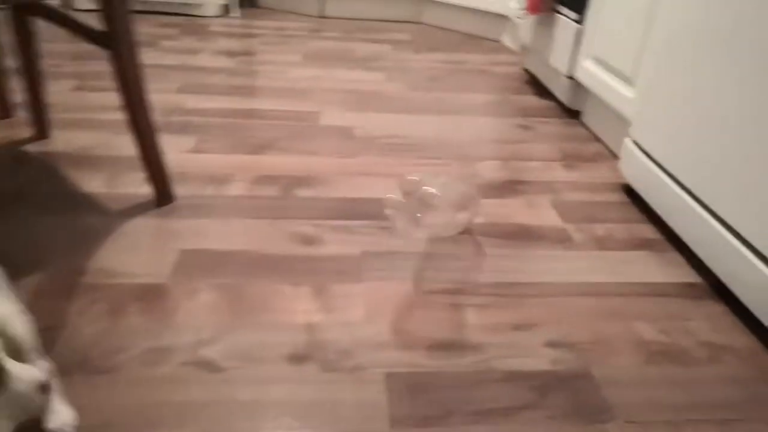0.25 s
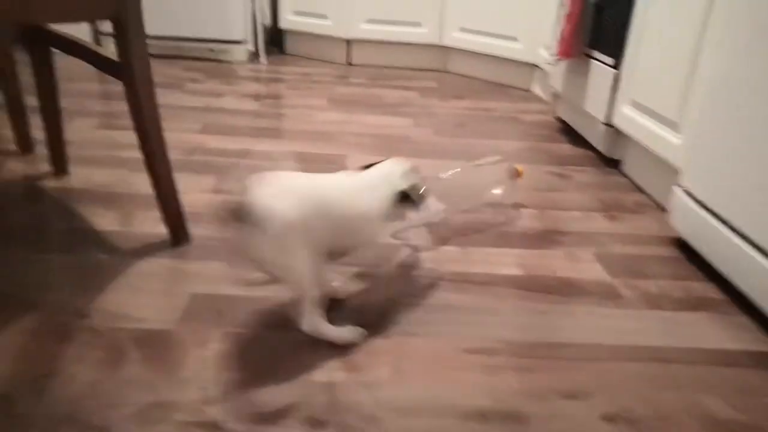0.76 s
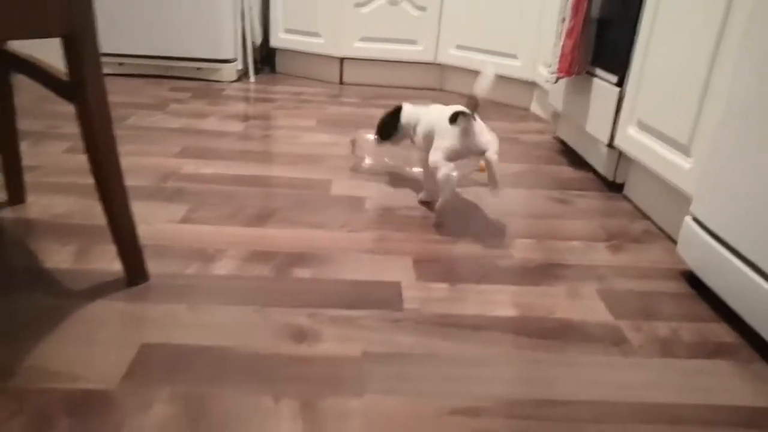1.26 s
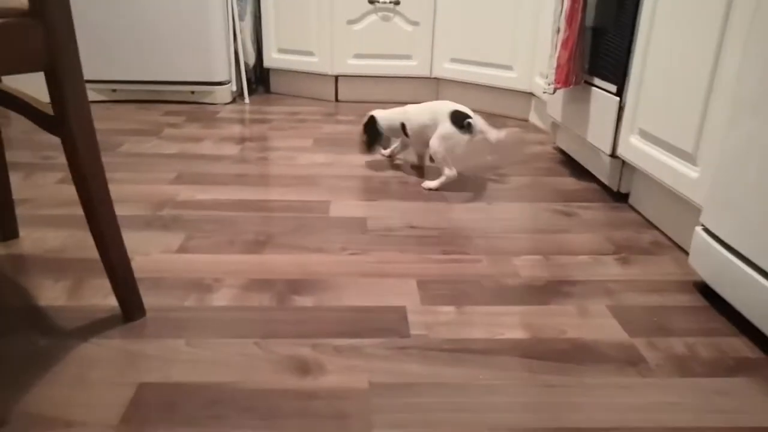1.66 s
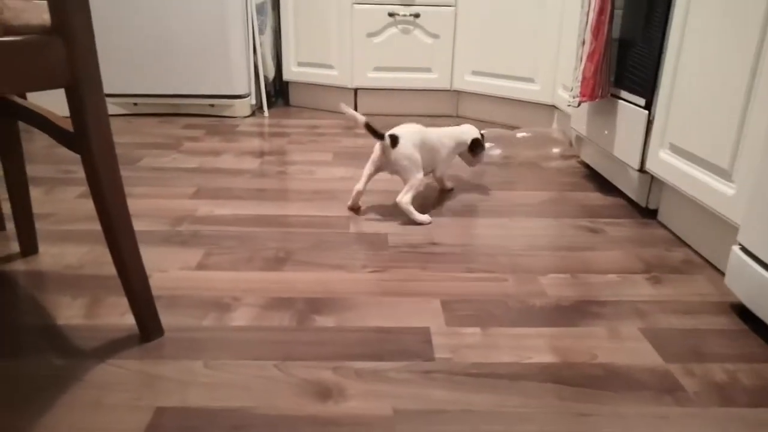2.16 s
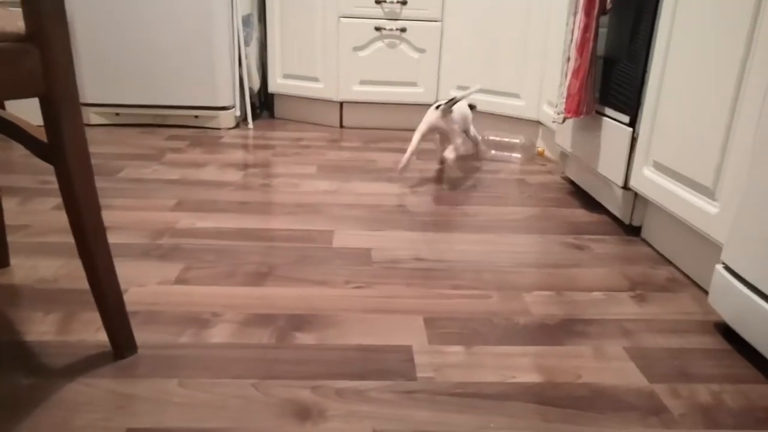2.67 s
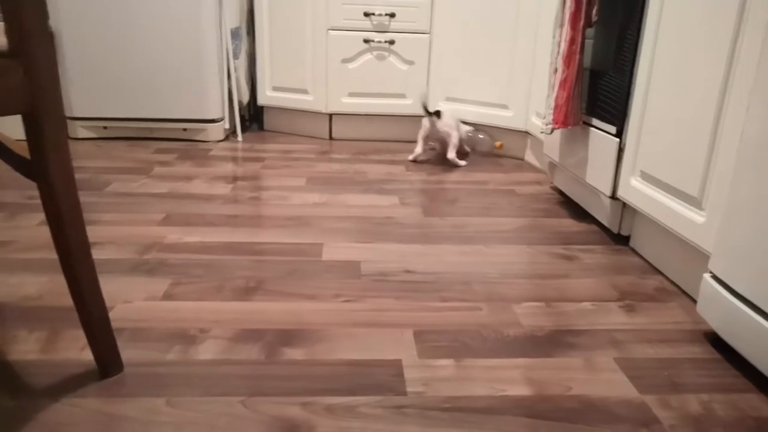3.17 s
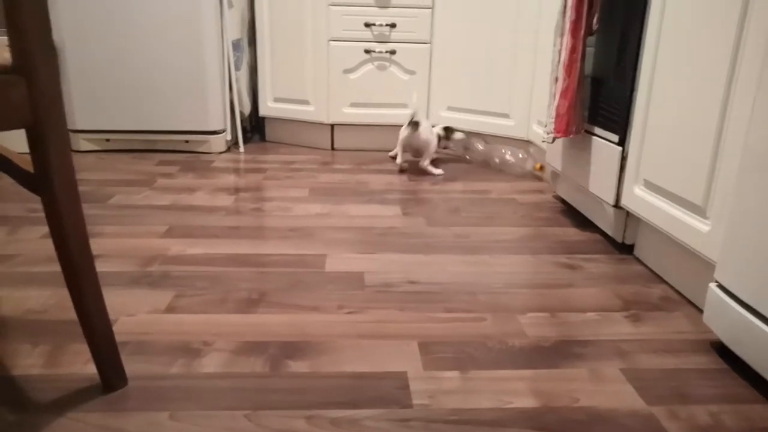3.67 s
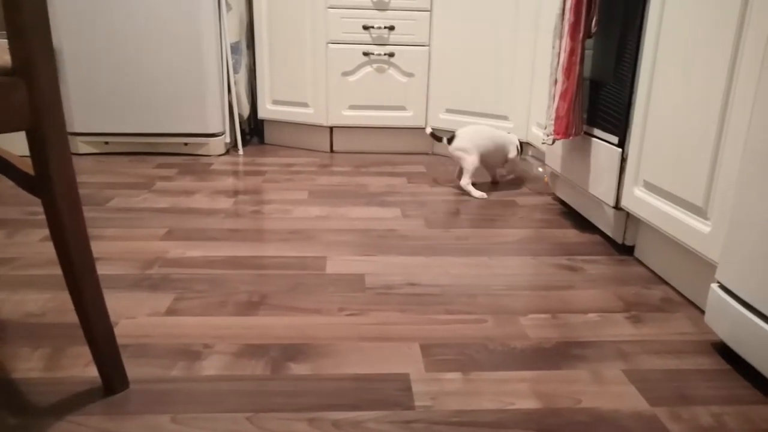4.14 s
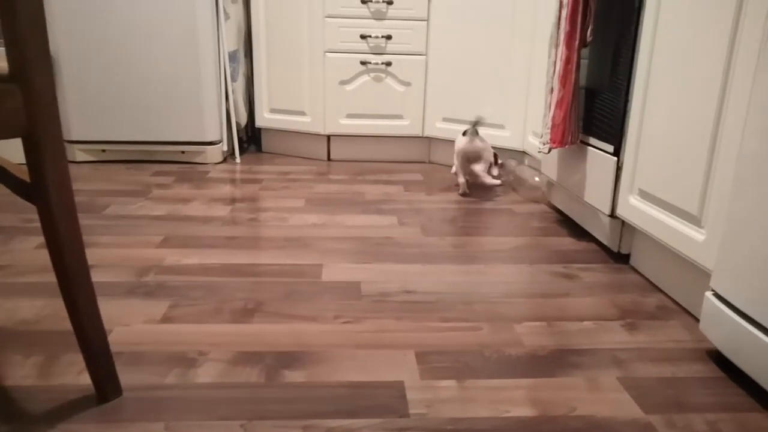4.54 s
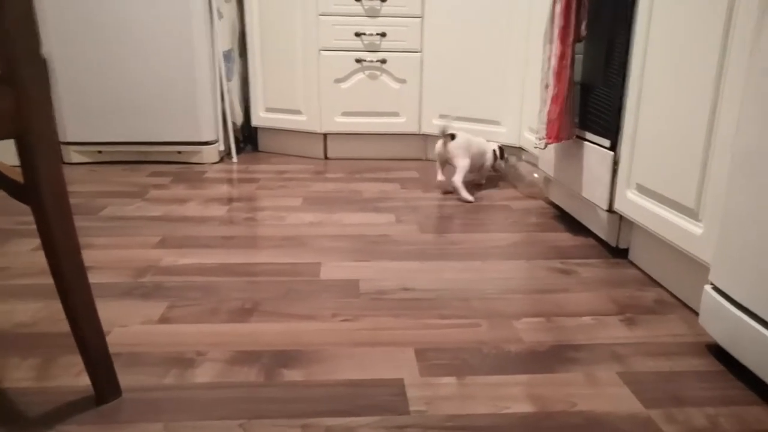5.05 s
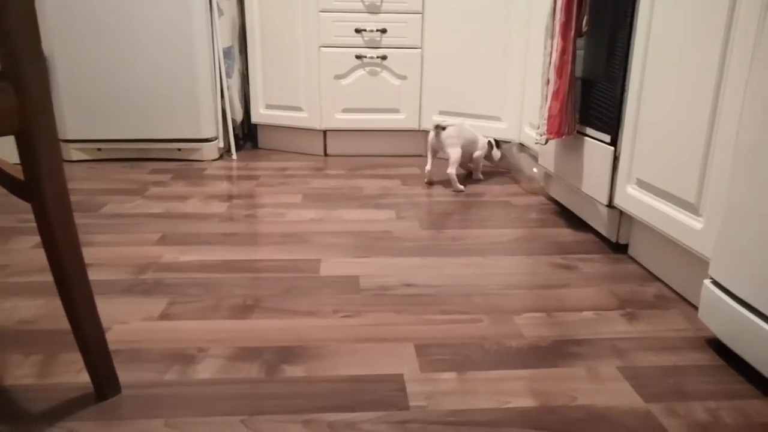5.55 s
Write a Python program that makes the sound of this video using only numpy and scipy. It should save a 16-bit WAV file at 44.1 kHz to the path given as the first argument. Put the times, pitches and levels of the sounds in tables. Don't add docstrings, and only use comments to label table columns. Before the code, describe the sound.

In a lively, hard-surfaced kitchen, a puppy plays with an empty thin plastic bottle. Two sharp snaps come at once near 0.1 s, then a hollow knock at 0.3 and a scrape at 0.4. A crush at 0.75 leads to clattering knocks from 0.9 to 1.2 s, followed by the densest flurry of bites, pops and bright crackle at 1.4-1.75. From about 1.8 to 2.7 there are only faint crinkles, light scraping and small bumps. Loud hollow cracks return at 2.75-3.0, with a sliding scrape, then lighter nudges to 3.5. Knocks and crushes cluster at 3.7-4.1, a heavy knock hits at 4.4 and a crush at 4.7. It is nearly quiet afterwards, with soft nudges from 5.0 and a last snap with a crunch around 5.55. Paws thump softly; short echoes and faint hiss surround everything as the bottle moves away from the stereo microphone.

```python
import sys
import numpy as np
from scipy import signal
from scipy.fft import rfft, irfft
from scipy.io import wavfile
from scipy.ndimage import uniform_filter1d

SR = 44100
rng = np.random.default_rng(int(sys.argv[2]) if len(sys.argv) > 2 else 0)


def voltage_ratio(level):
    return 10 ** (np.asarray(level, float) / 20)


def master(y):
    cut = np.clip(np.atleast_2d(y).T, -1, 1)
    pcm = np.round(cut * 32767)
    wavfile.write(sys.argv[1], SR, pcm.astype(np.int16))


N = 256212

# (pitch [Hz], level [dB], time to fade by 60 dB [s])
HOLLOW_MODES = [(151.2, -15, 0.14), (245, -8.5, 0.15), (292, -9, 0.1007), (364, -3.5, 0.026),
                (523, -1.5, 0.021), (659.4, -1.5, 0.0045)]
SHELL_MODES = [(635, -0.5, 0.016), (801, 0.5, 0.015), (923, 1.5, 0.0254), (1176, 5, 0.018),
               (1269, 4.5, 0.0205), (1733, 5, 0.005)]
WALL_MODES = [(1470, -15, 0.0077), (1690, -8.5, 0.01654), (1759, -5.5, 0.014), (1984, -5.5, 0.01207),
              (2130, -4, 0.016), (2310, 2, 0.0041), (2650, -5, 0.014), (2830, -3, 0.0024)]
CREASE_MODES = [(3053, 2.5, 0.00089), (5100, -2, 0.0024), (5733, -6, 0.0038), (6740, -4, 0.001158),
                (8350, -18, 0.0004), (9466, -21, 0.00172), (10600, -40, 0.001), (13730, -21, .0004)]

# (time [s], peak [dB], shell relative to peak [dB], creases relative to peak [dB])
KNOCKS = [(.337, -6, 0.5, -23.5), (.928, -7.5, -14, -22), (1.023, -34.5, -17, -24),
          (1.122, -1.5, -11.5, -19), (1.211, -2, -17.5, -27.5), (1.4262, -7.5, -3.5, -19),
          (2.366, -22.5, -14, -30.5), (2.983, -1, -4.5, -42), (3.377, -17.5, -5.5, -23.5),
          (3.725, -4.5, 0, -66), (3.885, -7, -13, -58), (4.428, 2.5, -4, -29), (4.696, -12.5, -32.5, -23)]
BITES = [
    (0.071, -5.5, -16, -17.5),
    (0.0925, -4, -14.5, -13.5),
    (1.4873, 1, -36.5, -16),
    (1.503, -21.5, -22, 1.5),
    (1.52, -7, -8.5, -17),
    (1.564, -2.5, -14, -8),
    (1.575, -22.5, -45, -14),
    (2.814, -1, -9, -29),
    (5.5646, -3, -23, -23.5),
]
NUDGES = [(0.252, -55.5, -17, 16), (.419, -23, 7.5, -2), (0.904, -17, -6, -16), (1.069, -24, 0, -22),
          (1.234, -24, 7, -15), (1.393, -23, 5, -26), (2.533, -30.5, 0, -33), (2.908, -17.5, 2.5, -14.5),
          (3.175, -19.5, -2.5, -29.5), (3.358, -24.5, -11, -32), (3.474, -23.5, -3, -21),
          (3.771, -27.5, -3, -10), (4.0245, -9, -8, -29.5), (4.075, -15, 4.5, -22), (5.034, -27.5, 5, -14),
          (5.372, -33, -2, -21.5), (5.476, -31.5, -14, -31), (5.525, -14.5, -3.5, -32.5),
          (5.535, -16, 3, -19)]
CRUMPLES = [(2.135, -33.5, -10, -8.5), (2.172, -32.5, -2.5, -36), (2.257, -29, -11.5, -7.5),
            (2.396, -36.5, 3.5, -5), (2.501, -26.5, -13, -47), (3.31, -27, -19, -28.5),
            (2.56, -48, 1.5, -24), (3.647, -38, -14, -18), (3.865, -24.5, -3, -22),
            (0.681, -44, -22.5, -9.5), (3.664, -24.5, 0.5, -15), (3.945, -22, -4, -17.5),
            (4.375, -31, 2, -19), (4.398, -24.5, -7.5, -26.5), (4.636, -33, -1, -16),
            (5.056, -22, 2, -17.5), (5.495, -38.5, 8.5, -29)]
CRUSHES = [
    (0.75, -6, -8, -14),
    (1.601, -21, -15.5, -3.5),
    (1.729, -16.5, -4, -14.5),
    (2.754, -9, -4, -26),
    (4.092, -10, -2, -28.5),
    (4.669, -11.5, 0.5, -24),
    (5.575, -26, -6, -26),
]
# (hollow air relative to peak [dB], crackle length [ms])
BLOW_KINDS = [
    (-22.5, 9.4),
    (-32.5, 6.37),
    (-9.5, 13.8),
    (-11, 35),
    (-23.5, 26.88),
]

# (from time [s], favoured wall pitch [Hz], favour [dB], crease brightness [dB per octave])
POSES = [(0, 2130, 6, -4.5), (.085, 2100, 6, -3), (.24, 2050, 4, -8), (.4, 2100, -1, 0.5),
         (.74, 2100, 1, 0), (.89, 2070, -2.5, -6), (1.11, 2620, 2, -4.5), (1.2, 2130, 1.1, -2.5),
         (1.38, 2060, 3.97, -5), (1.48, 2318, 11.5, -1.5), (1.55, 2060, 5, -4), (1.72, 1950, -1.03, -1),
         (2.12, 2200, 4, 4), (2.35, 2200, 0.5, -1), (2.74, 1880, 1.5, 0), (2.805, 1900, 4, -2),
         (2.97, 1530, 3, -1.3), (3.3, 1870, 1.5, 1.5), (3.65, 2650, 3.5, -4.08), (3.72, 2000, 2.32, -4),
         (3.87, 2080, 3.37, -1.23), (4.01, 1680, 0.5, -7), (4.36, 2100, -2.9, 6), (4.42, 1900, 2, -8.5),
         (4.63, 1720, 0.5, 1), (5.02, 1900, -4.8, -0.6), (5.35, 1900, 4, 0.1), (5.51, 1700, -2, -1),
         (5.555, 1700, 9, -13)]
# (time [s], peak [dB], pitch [Hz], time to fade by 60 dB [s])
BOOMS = [(0.069, -17, 358, 0.085), (0.165, -31.5, 242, 0.248), (0.335, -27, 374, 0.25),
         (0.416, -20, 203, 0.15), (0.763, -23.5, 270, 0.0605), (0.908, -22.5, 289, 0.086),
         (1.07, -24.5, 274, 0.176), (1.115, -17, 121, 0.095), (1.423, -10.5, 331, 0.0423),
         (1.801, -34.5, 277, 0.87), (1.897, -33.5, 261, 0.097), (2.187, -33, 383, 0.2),
         (2.408, -19, 236, 0.097), (2.451, -24, 247.4, 0.3), (2.815, -10, 300, 0.092),
         (2.935, -14, 335, 0.12), (2.989, -13, 236, 0.15), (2.83, -21, 245, 0.4), (3.165, -22, 298, 0.2),
         (3.372, -15.5, 245, 0.0727), (3.478, -27, 258, 0.45), (3.734, -19, 290, 0.18),
         (3.886, -20, 255, 0.2), (3.93, -24, 370, 0.3), (3.6, -36, 300, 0.4), (2.5, -30, 245, 0.4),
         (4.021, -15, 245.4, 0.164), (4.375, -28.5, 129, 0.25), (4.425, -13, 195, 0.077),
         (4.685, -20, 213.2, 0.1045), (5.052, -27, 130.4, 0.32), (5.167, -18, 176, 0.034),
         (5.37, -35.5, 155.6, 0.125), (0.907, -25.5, 156.5, 0.248), (1.223, -31, 144.2, 0.188),
         (1.95, -39, 100.4, 0.147), (2.915, -25, 152.7, 0.486), (3.13, -29, 159.4, 0.375),
         (3.361, -29.5, 146.7, 0.28), (3.479, -27, 165, 0.15), (4.021, -29, 160, 0.347),
         (4.53, -32, 149, 0.3), (5.495, -26.5, 182, 0.136), (5.526, -23, 157.9, 0.2),
         (5.56, -34, 72.2, 0.9), (5.53, -23, 292, 0.1)]
# (time [s], peak [dB], pitch [Hz], time to fade by 60 dB [s])
BASE_RINGS = [(0.0952, -25.5, 1110, 0.094), (0.7552, -23, 1100, 0.2), (0.9274, -19, 1195, 0.22),
              (1.018, -28, 1173, 0.25), (0.98, -29, 1160, 0.3), (1.518, -28, 554, 0.16),
              (2.7545, -26, 1295, 0.2), (2.94, -27, 1150, 0.2), (2.8438, -20, 1131, 0.24),
              (3.018, -29, 1200, 0.33), (3.08, -33, 1113, 0.37), (3.3567, -27.5, 1176, 0.039),
              (3.4725, -32, 1260, 0.061), (3.7256, -19.5, 1179, 0.18), (3.76, -19, 1128, 0.13),
              (3.8831, -24, 1184, 0.28), (4.0244, -30, 1066, 0.4), (4.4275, -19, 1186, 0.23),
              (4.4725, -26, 1268, 0.13), (4.6723, -26, 964.6, 0.12), (4.6981, -26, 1253, 0.16),
              (5.036, -38.5, 1262, 0.62), (5.5637, -27, 910, 0.15), (0.0735, -22, 2110, 0.045),
              (0.112, -34.5, 2065, 0.136), (4.805, -40, 1850, 0.3), (4.11, -36, 1690, 0.43),
              (4.1, -29.5, 2650, 0.117), (4.76, -37.5, 1690, 0.22), (4.45, -25.5, 1053, 0.1),
              (3.684, -36, 2700, 0.1)]
# (time [s], peak [dB], pitch [Hz], length [ms])
DENT_POPS = [(0.0735, -3.5, 2180, 2.2), (0.0934, 2, 2090, 2.6), (0.337, -2.5, 1890, 2.94),
             (0.416, -8.5, 2200, 2), (0.9275, -5, 1176, 4.5), (0.941, -12, 1150, 8), (0.955, -15, 1150, 12),
             (1.4557, -14, 2600, 2), (1.5025, -12, 4600, 1.2), (1.531, -9, 2500, 3),
             (1.536, -10, 2900, 2.5), (1.551, -11, 1500, 3), (1.5658, -5, 6600, 1.2), (1.570, -12, 5300, 3),
             (1.577, -8, 2500, 3), (1.604, -10, 2100, 4), (4.6732, -14, 1000, 2.5), (4.6865, -14, 1200, 3),
             (4.637, -26, 900, 2), (2.8245, -8, 1100, 2), (1.234, -12, 2100, 2), (0.0728, -8, 2900, 1.2),
             (0.0955, -8, 2700, 1.5), (0.097, -14, 1400, 2), (0.419, -10, 1200, 1.5),
             (3.7255, -5, 1300, 1.6), (1.124, -5.5, 2560, 4.5), (1.4308, 0.5, 2040, 1.66),
             (1.488, -1, 2100, 2.5), (1.499, -9, 2550, 9.6), (1.566, -5.5, 2368, 3.66),
             (1.573, -2, 2200, 3.5), (1.733, -13, 1850, 3.5), (1.2115, -8, 2287, 2.1),
             (3.474, -20, 1300, 2), (4.0245, -14, 1100, 3.1), (2.8145, -5.5, 2500, 4),
             (0.3385, -4, 1236, 3.6), (0.0725, -14, 747, 4), (0.0945, -12, 1147, 3.9),
             (4.4295, -10.5, 540, 6.6), (0.7535, -4.5, 2040, 1.23), (1.5195, -6, 2200, 2),
             (4.435, -15.5, 1700, 1.18), (4.0956, -10, 2360, 2.2), (2.816, 2, 1010, 1.7),
             (2.983, 5, 1355, 2.5), (3.728, -8, 1392, 3.6), (3.885, -28, 1190, 1.7),
             (4.428, -2.5, 1568, 3.1), (5.528, -12, 288.2, 6.5), (5.549, -17, 408, 4.2),
             (5.5645, -7, 1070, 3.8)]
# (time [s], peak [dB])
CAP_TICKS = [
    (0.2725, -55),
    (0.642, -51),
    (1.042, -51),
    (2.261, -46),
    (2.8194, -51.5),
    (3.666, -45.5),
    (3.6933, -47),
    (3.7863, -57),
    (4.0228, -32.5),
    (4.045, -60),
]
# (time [s], scraping [dB], hold [s])
SHOVES = [(.26, -25.5, 0.014), (.42, -19, 0.094), (.6, -27.5, 0.0273), (1.03, -24.5, 0.028),
          (1.24, -15, 0.0277), (1.445, -13, 0.021), (1.65, -26, 0.11), (1.86, -38, 0.185),
          (2.2, -39.5, 0.142), (2.43, -28, 0.011), (2.52, -32, 0.06), (2.785, -22.5, 0.02),
          (1.5, -19.5, 0.037), (2.95, -17, 0.178), (3.45, -33, 0.131), (3.9, -20.5, 0.041),
          (4.3, -33.5, 0.152), (4.58, -34, .08), (4.9, -48, .1), (2.66, -47, .07), (.68, -42, .06),
          (3.6, -42, .05), (5.2, -43.5, 0.17), (5.4, -43, .08), (5.64, -24, 0.0497)]
# (time [s], level [dB], hold [s])
FOOTFALLS = [(.07, -39.5, 0.01), (.335, -87, .01), (.41, -41.5, 0.0095), (.77, -64, .02),
             (.9, -41.5, 0.038), (1.12, -35, 0.058), (1.22, -40, 0.023), (1.43, -37.5, 0.017),
             (1.96, -67, 0.033), (2.19, -48.5, 0.1056), (2.42, -52, 0.0146), (2.52, -69.5, 0.018),
             (2.81, -65, .02), (2.93, -36.5, 0.039), (3.05, -38, 0.16), (3.49, -45.5, 0.0087),
             (3.77, -61.5, 0.025), (3.9, -43.5, 0.258), (4.39, -48, 0.065), (4.53, -52, 0.057),
             (4.69, -44, 0.022), (5.06, -47.5, 0.059), (5.2, -50, 0.075), (5.38, -52, 0.027),
             (5.54, -43, 0.18)]

# (pitch [Hz], time to fade by 60 dB [s])
ECHO_TIMES = [(80, 0.26), (250, 0.31), (600, 0.47), (1500, 0.5), (4000, 0.55), (10000, 0.43), (14000, 0.42)]
# (pitch [Hz], left-right likeness [0 to 1])
LIKENESS = [(60, 1), (130, 1), (290, 0.75), (640, 0.46), (1410, 0.068), (3100, 0.1), (6820, 0.4),
            (15000, .05)]
# (pitch [Hz], level [dB per Hz])
HUSH_COLOUR = [(24, -12), (45, -6), (125, -19.5), (401, -15), (597, -26), (1920, -22), (4000, -23),
               (13000, -48.5)]
# (pitch [Hz], left minus right [dB])
PORT_COLOUR = [(150, -0.55), (700, 0.5), (2050, -5.5), (3600, -4), (6500, 1.7), (9800, 26.5), (12000, 10.5),
               (15000, 2)]

SHOVE_RISE_DB_S, SHOVE_FALL_DB_S, REST_DB = 387.5, 200, -53
STEP_RISE_DB_S, STEP_FALL_DB_S, STILL_DB = 898, 221, -71
ROLL_DB, CRINKLE_DB = 5, -20
FAVOUR_OCTAVES, CREASE_PIVOT_HZ = 0.15, 6040
KITCHEN_DB, HUSH_DB = 5.5, -61.5
KNEE_S, KNEE_DB = 0.18, -11
CLOSE_DB, LEAVING_S = 3.5, 0.94
GATE_DB, GATE_SLOPE, GATE_DEPTH_DB, GATE_RELEASE_DB_S = -41, 0.3, 5, 250
TOP_HZ = 15100


def rms_one(x):
    return x / np.sqrt(np.mean(x ** 2) + 1e-20)


def at_hz(points, hz):
    table_hz, value = np.transpose(points)
    return np.interp(np.log(hz + 1), np.log(table_hz), value)


def band(x, low_hz, high_hz):
    limits = [low_hz, min(high_hz, 0.47 * SR)]
    return signal.sosfilt(signal.butter(2, limits, "band", fs=SR, output="sos"), x)


def ring(clicks, hz, t60):
    r, w = voltage_ratio(-60 / (t60 * SR)), 2 * np.pi * hz / SR
    return signal.lfilter([0, np.sin(w)], [1, -2 * r * np.cos(w), r * r], clicks + 1e-18)


def grains(per_s, spread_db):
    at = np.flatnonzero(rng.random(N) < per_s / SR)
    size = voltage_ratio(spread_db * np.minimum(rng.exponential(1, N)[at], 3))
    clicks = np.zeros(N)
    clicks[at] = size * np.sign(rng.random(N)[at] - 0.5)
    return rms_one(clicks)


def alike_pair(a, b):
    alike = np.clip(at_hz(LIKENESS, np.arange(len(a) // 2 + 1) * SR / len(a)), -0.99, 0.99)
    mid = rfft(a) * np.sqrt(1 + alike)
    side = rfft(b) * np.sqrt(1 - alike)
    return irfft([mid + side, mid - side], len(a))


def swells(rows, rise_db_s, fall_db_s, rest_db):
    t, level = np.arange(N) / SR, np.full(N, float(rest_db))
    for s, db, hold_s in rows:
        rising = rise_db_s * np.maximum(s - t, 0)
        falling = fall_db_s * np.maximum(t - s - hold_s, 0)
        level = np.maximum(level, db - rising - falling)
    return level


def struck(rows, rise_s, beat, partner, offset_db):
    out, t = np.zeros(N + SR), np.arange(SR // 2) / SR
    for (s, db, hz, t60), phase in zip(rows, rng.random(len(rows))):
        first = np.sin(2 * np.pi * hz * t)
        second = np.sin(2 * np.pi * (hz * (1 + beat) * t + phase))
        level = voltage_ratio(db + offset_db - 60 * t / t60) * (1 - np.exp(-t / rise_s))
        out[int(s * SR):][:len(t)] += level * (first + partner * second)
    return out[:N]


def hush():
    pair = alike_pair(*rng.standard_normal((2, N)))
    colour = voltage_ratio(at_hz(HUSH_COLOUR, np.arange(N // 2 + 1) * SR / N))
    return voltage_ratio(HUSH_DB) * rms_one(irfft(rfft(pair) * colour, N))


def paws(thump_db):
    steps = grains(360, spread_db=1.0)
    boards = -0.25 * ring(steps, 48, 0.12) + ring(steps, 73, 0.14) + 1.5 * ring(steps, 120, 0.08)
    return voltage_ratio(thump_db) * rms_one(band(boards, 24, 310))


def blows():
    rows = []
    for kind, (hollow_db, ms) in zip((KNOCKS, BITES, NUDGES, CRUMPLES, CRUSHES), BLOW_KINDS):
        for s, db, shell_db, crease_db in kind:
            rows.append((s, db, hollow_db, shell_db, crease_db, ms))
    return np.array(rows)


def lean_db(hz):
    s, best_hz, favour_db, tilt_db = np.transpose(POSES)
    if hz > 3050:
        db = tilt_db * max(np.log2(hz / CREASE_PIVOT_HZ), -0.3)
    else:
        nearness = np.exp(-(np.log2(hz / best_hz) / FAVOUR_OCTAVES) ** 2)
        db = favour_db * (nearness - 0.6) * (hz > 1400)
    pose = np.searchsorted(s, np.arange(0, N, 64) / SR) - 1
    return db[np.clip(pose, 0, None)]


def part(modes, blow_db, rub_db, crackle_db, uneven_db):
    rows = blows()
    at, ms = (rows[:, 0] * SR).astype(int), np.clip(rows[:, 5], 0.5, 60)
    fading = np.zeros(N)
    for start, level, length in zip(at, voltage_ratio(blow_db), ms):
        tail = np.exp(-np.arange(min(N - start, 8000)) / (length * SR / 1000))
        fading[start:start + len(tail)] += level * tail
    push = (voltage_ratio(crackle_db) * fading + voltage_ratio(rub_db)) * grains(2500, spread_db=5.5)
    sharp_db = blow_db - 0.5 * ms
    chance = rng.standard_normal((len(at), len(modes)))
    out = 0
    for k, (hz, db, t60) in enumerate(modes):
        clicks = push.copy()
        clicks[at] += voltage_ratio(sharp_db + uneven_db * chance[:, k])
        grip = np.repeat(voltage_ratio(lean_db(hz)), repeats=64)[:N]
        out = out + voltage_ratio(db) * (-1) ** k * ring(clicks * grip, hz, t60)
    return band(out, 0.72 * modes[0][0], 1.8 * modes[-1][0])


def bottle(roll_db, scrape_db, crinkle_db):
    s, peak, hollow, shell, crease, ms = blows().T
    boom = part(HOLLOW_MODES, peak + hollow + 0.042, roll_db - 49.5, crackle_db=-22.0, uneven_db=7.0)
    knock = part(SHELL_MODES, peak + shell - 4.0, scrape_db - 46.5, crackle_db=-30.5, uneven_db=-0.5)
    clack = part(WALL_MODES, peak - 12.0, scrape_db - 32.5, crackle_db=-16.5, uneven_db=4.5)
    snap = part(CREASE_MODES, peak + crease + 0.11, crinkle_db - 16.0, crackle_db=-10.0, uneven_db=-2.0)
    air = struck(BOOMS, rise_s=0.0014, beat=0.237, partner=0.42, offset_db=-5.5)
    return boom + knock + clack + snap + air + cap()


def pops():
    out = np.zeros(N)
    for s, db, hz, ms in DENT_POPS:
        samples = max(ms, 0.5) * SR / 1000
        u = np.arange(int(samples)) / samples
        cycles = hz * ms / 1000 * (1.228 * u - 0.18 * u ** 2)
        out[int(s * SR):][:len(u)] += voltage_ratio(db - 5.5) * np.sin(np.pi * u) ** 2 * np.sin(2 * np.pi * cycles)
    return out


def flutter(rate_hz, depth_db):
    r = np.exp(-2 * np.pi * rate_hz / SR)
    wander = rms_one(signal.lfilter([1], [1, -2 * r, r * r], rng.standard_normal(N)))
    return rms_one(voltage_ratio(depth_db * np.tanh(wander)))


def cap():
    s, db = np.transpose(CAP_TICKS)
    fading = np.zeros(N)
    fading[(s * SR).astype(int)] = voltage_ratio(db - 6.0)
    fading = signal.lfilter([1], [1, -np.exp(-1 / (0.0033 * SR))], fading)
    return fading * rms_one(band(grains(2700, spread_db=2.5), 9320, 10330))


def kitchen(x):
    size, places = SR * 3 // 4, 6
    t = np.arange(size) / SR
    left_right = alike_pair(*rng.standard_normal((2, size * places))).reshape(2, places, size)
    edges, echo = 40 * 2 ** np.arange(0, 9.1, 0.5), 0
    for low, high in zip(edges, edges[1:]):
        t60 = at_hz(ECHO_TIMES, np.sqrt(low * high))
        echo = echo + band(left_right, low, high) * voltage_ratio(-60 * t / t60)
    build_up = 1 - np.exp(-t / 0.0033)
    echo = echo * build_up * voltage_ratio(KNEE_DB / (1 + np.exp((KNEE_S - t) / 0.012)))
    echo = echo / np.sqrt(np.sum(echo ** 2) / (2 * places))
    turn = np.arange(N) / SR / 0.025 % places
    share = [np.clip(1 - np.abs((turn - k + 3) % places - 3), 0, 1) ** 0.5 for k in range(places)]
    return signal.fftconvolve((x * share)[None], echo, axes=2).sum(axis=1)[:, :N]


def scene():
    thump_db = swells(FOOTFALLS, STEP_RISE_DB_S, STEP_FALL_DB_S, STILL_DB)
    scrape_db = swells(SHOVES, SHOVE_RISE_DB_S, SHOVE_FALL_DB_S, REST_DB)
    direct = bottle(scrape_db + ROLL_DB, scrape_db, scrape_db + CRINKLE_DB)
    base = struck(BASE_RINGS, rise_s=0.001, beat=-0.055, partner=0.55, offset_db=1.0)
    boards = paws(thump_db)
    dents = pops()
    left, right = voltage_ratio(KITCHEN_DB) * kitchen(direct + 0.18 * base + 0.75 * dents + 0.68 * boards)
    room = np.array([0.94 * np.roll(left, shift=26) + 0.15 * np.roll(left, shift=2), right])
    near = (direct + dents) * voltage_ratio(CLOSE_DB * np.exp(-np.arange(N) / SR / LEAVING_S))
    round_the_case = 0.6 * np.roll(near, shift=2) + 0.32 * np.roll(near, shift=26)
    base_pair = base * flutter(rate_hz=35.0, depth_db=4.0) * voltage_ratio([[-1.5], [0]])
    return np.array([round_the_case, near]) + base_pair + room + boards + hush()


def gate(x):
    fall_db = GATE_RELEASE_DB_S * np.arange(N) / SR
    level_db = 10 * np.log10(uniform_filter1d(np.mean(x ** 2, axis=0), size=441) + 1e-12)
    held_db = np.maximum.accumulate(level_db + fall_db) - fall_db
    cut_db = np.clip(GATE_SLOPE * (GATE_DB - held_db), 0, GATE_DEPTH_DB)
    return x * voltage_ratio(-uniform_filter1d(cut_db, size=221))


def top_cut(x):
    return signal.sosfilt(signal.butter(12, 15890, fs=SR, output="sos"), x)


def record(dry):
    tilt = at_hz(PORT_COLOUR, np.arange(1025) * SR / 2048) * np.log(10) / 40 * [[1], [-1]]
    cepstrum = irfft(tilt)
    cepstrum[:, 1:1024] *= 2
    cepstrum[:, 1025:] = 0
    heard = signal.fftconvolve(dry, irfft(np.exp(rfft(cepstrum))), axes=1)[:, :N]
    treble_cut = signal.cheby2(10, 30, TOP_HZ + 500, fs=SR, output="sos")
    heard = signal.sosfilt(treble_cut, band(heard, 45, 19000))
    mix = np.clip(1.6 * np.tanh(gate(heard) / 1.6), -1, 1)
    return top_cut(mix)


dry = scene()
out = record(dry)
master(out)
```